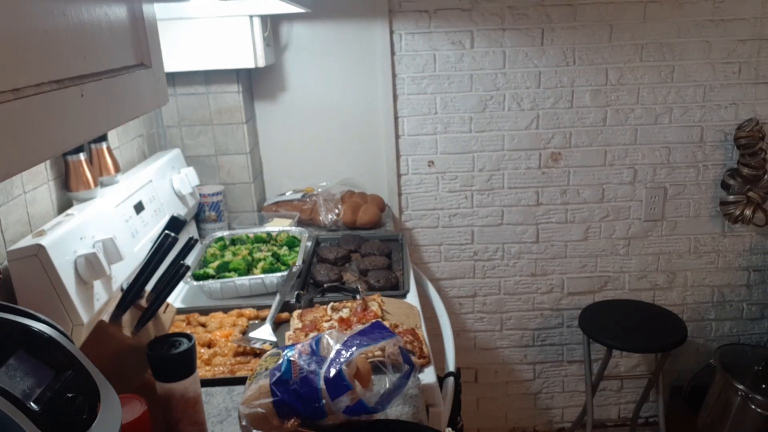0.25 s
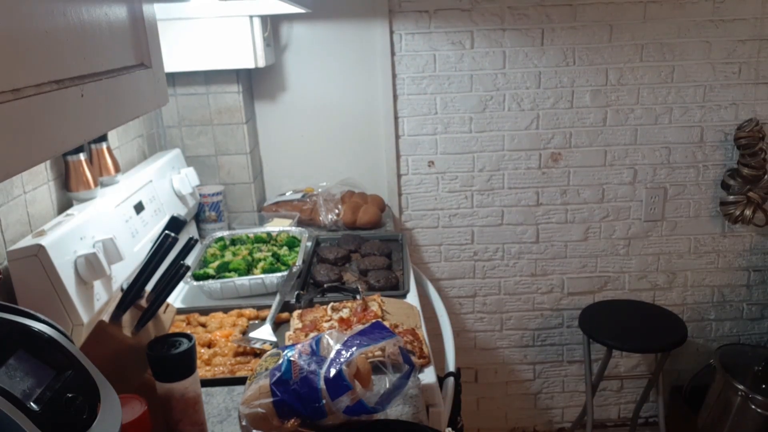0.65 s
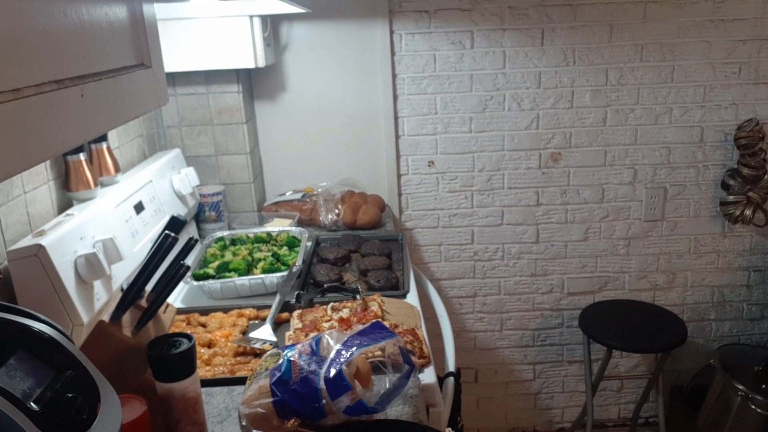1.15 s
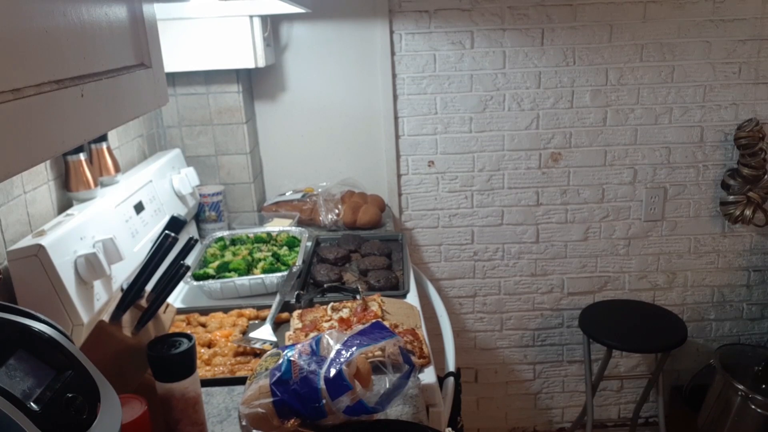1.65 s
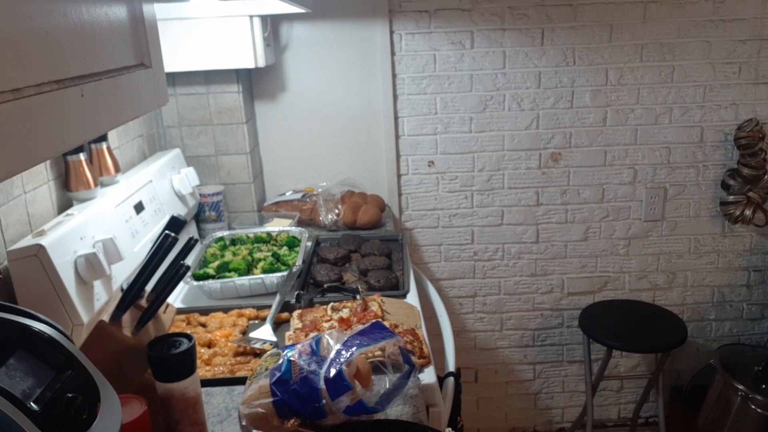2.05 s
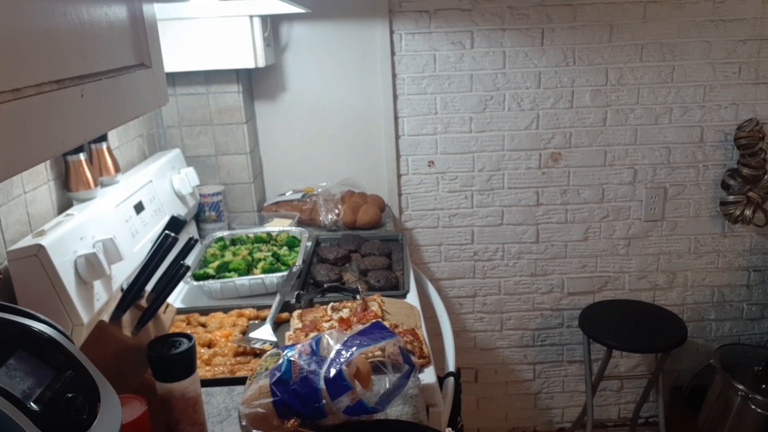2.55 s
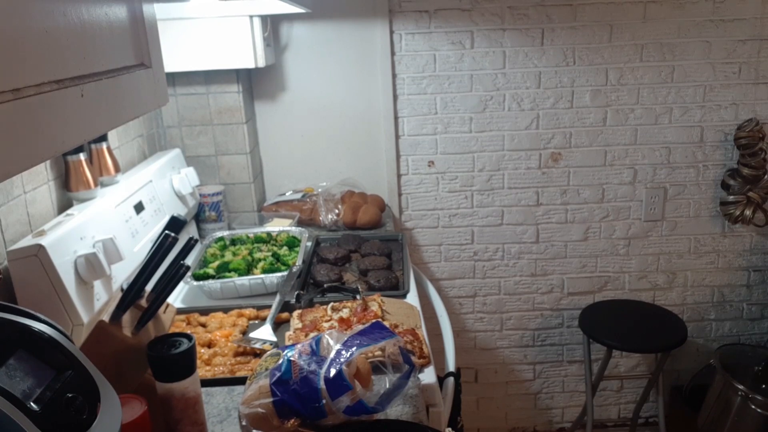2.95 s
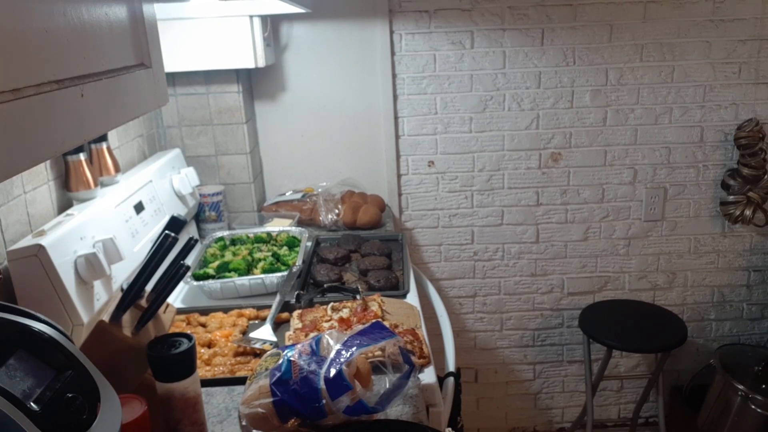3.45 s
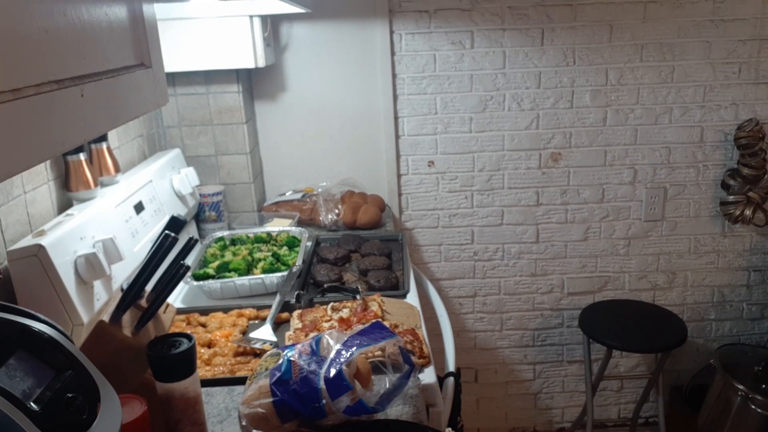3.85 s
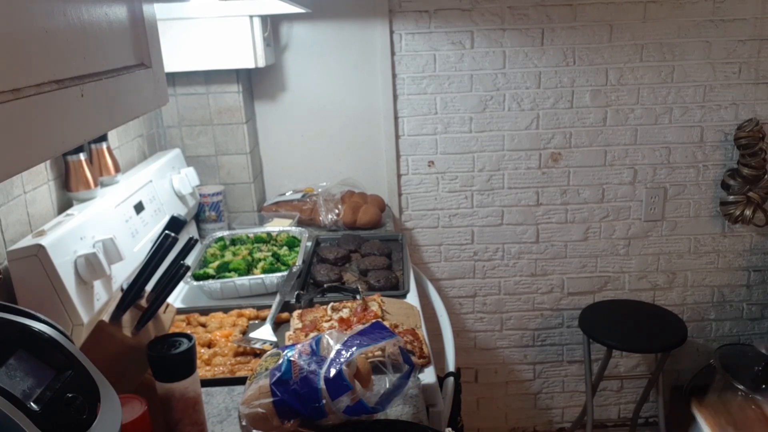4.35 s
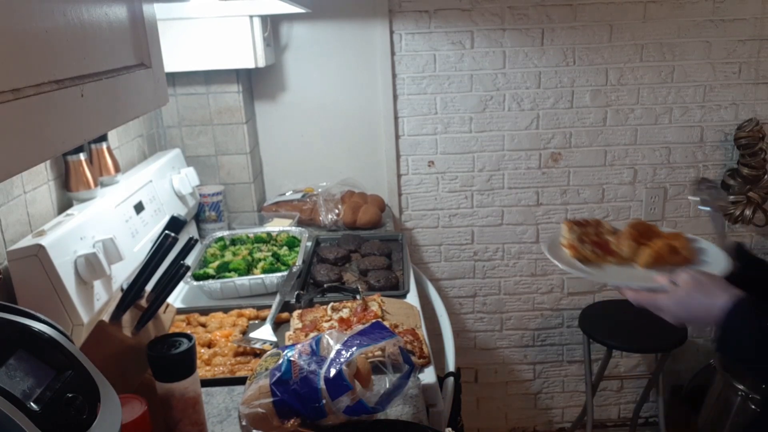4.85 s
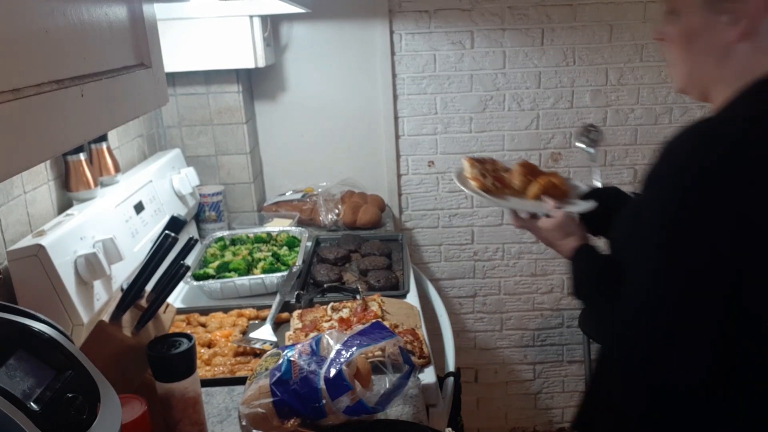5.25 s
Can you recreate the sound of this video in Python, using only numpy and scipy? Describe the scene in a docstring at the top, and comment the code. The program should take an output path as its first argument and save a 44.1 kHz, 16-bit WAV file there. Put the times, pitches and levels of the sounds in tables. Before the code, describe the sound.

Foil tray scooping comes first: sharp buckling, gritty scrapes, padded knocks and wet little plops, in uneven bursts. After a final crackling scrape and knock, a quiet gap follows with faint hum and room air. Then clothing swishes and soft footfalls come closer, with small ticks and a single bouncing spoon clink on a plate. The stationary stereo microphone hears lively indoor reflections.

```python
"""Scooping food from a foil tray

A steel spoon digs food out of a thin aluminium tray in a small, hard-walled kitchen. Rasps, crackles and the
tray's boom are streams of tiny slips; buckles and soft plops are shaped bursts of noise. A knock's boom is the
tray's lowest tone ringing out. Steps and rustling sleeves come nearer, with light ticks; a spoon clinks on a
china plate among them. The plate is made of ringing tones that fade away; room air and a faint appliance hum
lie below."""
import sys
import numpy as np
from scipy import signal
from scipy.fft import rfft, irfft, next_fast_len
from scipy.io import wavfile
from scipy.ndimage import uniform_filter1d, map_coordinates

SR = 44100
rng = np.random.default_rng(int(sys.argv[2]) if len(sys.argv) > 2 else 0)


def unload_wav(signal):
    """Save mono or channel-first audio to the path in sys.argv[1] as 16-bit WAV at rate SR, clipped to [-1, 1]."""
    wavfile.write(
        sys.argv[1],
        SR,
        np.round(np.clip(np.atleast_2d(signal).T, -1, 1) * 32767).astype(np.int16),
    )


N = 242285
TIME = np.arange(N) / SR  # seconds, whole scene
T = TIME[:SR // 2]  # seconds, one short sound

# Table levels are relative: the *_db settings of the functions and the room shift them further.
# Fade times (t60) are the time to fall by 60 dB, before any damping setting shortens them.

# Strokes of the spoon: (start [s], swell time [s], length [s], rasp at full swell [dB],
# rise during the swell [dB], foil fizz relative to the rasp [dB])
STROKES = [(0.048, 0.03, 0.35, -46.5, -10, -5), (0.373, 0.24, 0.71, -24, 17, 0),
           (0.652, .005, 0.02, -23, -5, 1), (1.129, 0.076, 0.11, -35.5, 14.5, -2),
           (1.325, 0.066, 0.13, -36, 11, -3.5), (1.49, .01, 0.014, -30, 3, 2.5),
           (1.534, 0.052, 0.45, -24.5, 23.5, -0.5), (1.941, 0.056, 0.31, -28.5, 1.5, 1),
           (2.318, 0.0093, 0.14, -44, 0, -6.5), (2.517, 0.075, 0.19, -46.5, 0, -9),
           (2.749, .06, .13, -50.5, -3, -7.5), (2.887, 0.5, 0.59, -30.5, 8.5, -2.5),
           (3.267, 0.022, 0.27, -37, 2, 9), (3.443, 0.017, 0.23, -22, 9, 5.5),
           (3.621, 0.019, 0.053, -27.5, -14, -1)]
HOLD_S, EASE_DB_PER_S = 0.062, 70  # the hand keeps up its pressure, then eases off
BITE_DB_PER_S, LIFT_DB_PER_S = 3002.5, 267  # the spoon meets the tray abruptly, leaves it gradually
BOOM_EVEN_DB = -36.5  # force at which boom and rasp are equal, before their own level settings
BOOM_GROWS = 0.57  # dB of boom per dB of rasp
# The foil buckles under the spoon: (time [s], peak [dB], fizz relative to it [dB])
BUCKLES = [(0.051, -26, -13), (0.145, -17.5, -3.5), (0.196, -15.5, -15), (0.343, -21, -27),
           (0.378, -16.5, -11), (0.44, -11.5, -8), (0.517, -13, 2), (0.572, -3, -13), (0.657, -1, -6),
           (0.92, -10, -11.5), (1.496, -8.5, -8.5), (2.05, -5, -3.5), (3.119, -13, -2.5),
           (3.454, -1.5, -11), (3.47, -1.5, -15), (3.501, -11, -3)]
# The spoon slips off the tray's rim and sings: (time [s], peak [dB])
RIM_SLIPS = [(1.39, -24)]
# The spoon knocks on the tray's floor: (time [s], peak [dB], boom relative to it [dB])
KNOCKS = [(0.5448, -10.5, -18), (1.141, -29, -22), (1.3684, -9.5, -17), (3.635, -14, 2)]
# Soft, dull plops and low thumps under the scraping: (time [s], peak [dB], wet smack relative to it [dB])
PLOPS = [(1.211, -20, -2.5), (1.498, -20.5, 11), (1.61, -16.5, -12), (1.679, -18.5, 4), (2.053, -14.5, -4),
         (2.076, -14.5, -15), (2.335, -16, -1), (2.352, -15.5, -6.5), (2.431, -20.5, -9), (2.61, -21, -5),
         (2.83, -24, -16), (2.847, -30.5, -5), (3.459, -11, -5), (3.642, -13, 0), (3.699, -30, 3)]
# Small morsels tumble while the spoon is in soft food
MORSELS_FROM_S, MORSELS_TO_S, MORSELS_PER_S = 2.4, 3.3, 8
MORSEL_DB, MORSEL_SMACK_DB, MORSEL_SCATTER_DB = -27.5, -6.5, 1.5
# The spoon lands on the plate and bounces: (time [s], level [dB])
CLINKS = [(4.9495, -3), (4.965, -20.5), (4.981, -15), (4.992, -17)]
# Light ticks on the plate: (time [s], peak [dB], treble relative to it [dB])
TICKS = [(3.919, -34, -15), (4.269, -33.5, -9), (4.5974, -27, -23), (4.874, -40.5, -20), (5.4211, -21, -10)]
PLATE_BLUR_HZ = 10  # the spoon chatters on the china and widens its tones
# Footfalls: (time [s], heel thud [dB], sole scuff [dB])
STEPS = [(4.354, -60, -34.5), (4.875, -45, -37.5), (5.15, -37.5, -30.5), (5.2, -30, -22.5),
         (5.288, -40.5, -33)]
# Sleeves swish while walking: (loudest moment [s], level [dB])
SWISHES = [(4.07, -59.5), (4.35, -57), (4.71, -51), (4.92, -58), (5.192, -38), (5.47, -47)]
SWISH_DB_PER_S = 147  # each swish rises and falls at this rate
# Steady rustle as the cook comes nearer: (time [s], level [dB])
RUSTLE = [(3.85, -64), (4.55, -63.5), (5.1, -49), (5.3, -48), (5.49, -45)]

# Ringing of the tray with the spoon in it: (frequency [Hz], level [dB], t60 [s])
TRAY_TONES = [(266.6, 0.5, 0.097), (378, -9.5, 0.16), (620, -8.5, 0.12), (822, -7, 0.098),
              (1090, -2.5, 0.1), (1320, -2, 0.088), (1444, -2.5, 0.067), (1830, -2.5, 0.06),
              (2110, -11, .1), (2700, -23.5, 0.15), (2810, -9.5, .1)]
# Ringing of the steel spoon: (frequency [Hz], level [dB], t60 [s])
SPOON_TONES = [(3790, -8, .15), (4082, 0, .2), (4900, -6, .12), (7320, -14, .2), (9151, -3, .18),
               (9894, -3, .18), (10071, -6, .14), (11532, -6, .12), (13697, -3, .16), (15346, -5, .14)]
# Ringing of the china plate: (frequency [Hz], level [dB], t60 [s])
PLATE_TONES = [(1030, -17, 0.1), (1420, -10.5, 0.2), (1737, -14, 0.16), (2060, -13, 0.2), (2610, -7, 0.29),
               (2836, 2, 0.13), (2820, -4.5, 0.21), (3220, 0.5, 0.12), (3300, -14, 0.28), (3770, -8, 0.2),
               (4210, -21, 0.12), (4600, -23, 0.1), (4730, 1, 0.081), (5450, -21, .2), (5460, -9.5, 0.11),
               (6020, -7, 0.14), (7300, -24.5, 0.24), (8660, -24, 0.24), (9900, -25, 0.28),
               (11300, -33, .16), (11560, -26, 0.24), (13600, -25, .16), (14900, -29, .16)]

# Noise colours; only the shape counts.
# The tray's boom: (frequency [Hz], density [dB per Hz])
BOOM = [(25, -59.5), (95, -26), (128, -10.5), (170, -16.5), (215, -4), (265, 0), (360, -2.5), (480, -2.5),
        (650, -7), (900, -18.5), (2000, -69.5), (8000, -80.5)]
# The tray's rasp: (frequency [Hz], density [dB per Hz])
RASP = [(60, -70.5), (300, -51.5), (600, -8), (850, -4), (1150, -4), (1700, -1), (2600, -5), (4000, -1),
        (5200, -3.5), (6500, -21.5), (7800, -22), (12000, -45.5)]
# The foil's fizz: (frequency [Hz], density [dB per Hz])
FIZZ = [(100, -80.5), (3000, -34.5), (6000, 0.5), (7200, -1.5), (7900, -8), (9000, 0.5), (11000, 4),
        (15600, 5), (17000, -10.5)]
# A soft, dull plop: (frequency [Hz], density [dB per Hz])
PLOP = [(25, -42.5), (70, -15.5), (128, -8.5), (170, -15.5), (250, -1), (370, 2.5), (480, -1.5),
        (650, -8.5), (900, -21.5), (2000, -42.5), (8000, -69.5)]
# A wet smack: (frequency [Hz], density [dB per Hz])
SMACK = [(60, -54.5), (400, -30.5), (900, 7), (1600, 7.5), (3000, 2), (5500, -10.5), (7500, -22),
         (15000, -21.5)]
# The crack of steel on china: (frequency [Hz], density [dB per Hz])
CRACK = [(60, -75), (400, -48), (750, -46), (1050, -13.5), (1900, 2.5), (2250, -19), (2900, 6.5),
         (4300, 2.5), (5900, 4.5), (6700, -25), (8000, -41), (10000, -29), (16000, -32)]
# A light tick on the plate: (frequency [Hz], density [dB per Hz])
TICK = [(100, -50), (700, -21), (2000, 4), (3300, 17.5), (5500, 19.5), (7500, -4.5), (15000, -30.5)]
# A heel on the floor: (frequency [Hz], density [dB per Hz])
THUD = [(25, -29), (55, -8), (78, -1), (100, -9), (125, -3), (200, -16), (500, -31), (4000, -77)]
# A sole on the floor: (frequency [Hz], density [dB per Hz])
SCUFF = [(80, -37), (250, 1.5), (400, 0.5), (620, -7), (1000, -9), (2000, -15.5), (5000, -29),
         (7500, -40.5), (15000, -42)]
# Rubbing cloth: (frequency [Hz], density [dB per Hz])
CLOTH = [(150, -18.5), (400, 4), (1000, -5), (2000, -4), (4500, -3.5), (6200, -10.5), (7500, -23),
         (15000, -21.5)]
# Room air: (frequency [Hz], density [dB per Hz])
AIR = [(18, -51), (30, -6.5), (95, -4.5), (170, -2.5), (449, -3.5), (649, -17.5), (1040, -15),
       (1390, -14.5), (4650, -20), (6720, -33), (7270, -34.5), (14800, -47), (16000, -38)]

# Appliance hum: (frequency [Hz], level [dB])
HUM = [(80.7, -69), (121, -64.5), (366, -72.5), (452, -75)]
# Fading of the room's tail, before its spectrum is flattened: (frequency [Hz], t60 [s])
WALLS = [(100, 0.6), (300, 0.32), (1500, 0.36), (5000, 0.33), (15000, 0.23)]
# How alike left and right are in echoes and air: (frequency [Hz], likeness from -1 to 1 [no unit])
ALIKE = [(100, 0.79), (300, 0.95), (640, 0.54), (1400, 0.062), (3100, -0.098), (7000, 0.032),
         (15000, 0.056)]
PORT_LAG = 5  # samples by which the right channel hears direct sound later
TOP_HZ = 16000  # band limit


def scraping(rasp_db=1.5, boom_db=-3, fizz_db=-1, tray_db=-11, spoon_db=-13):
    """The spoon's slips shake the tray's floor, rasp on its ribs and crackle its creases."""
    force, creasing = strokes()
    grip = shifting(slips(rate=900, spread_db=5.5, clump_db=2.5), depth_db=2)
    contact = force * grip
    rasp = amp(rasp_db) * colour(contact, RASP)
    tray = amp(tray_db) * thin(resonate(contact, TRAY_TONES, damping=2.7), lowest_hz=210)

    # the boom grows more slowly than the rasp
    shaking = amp(BOOM_EVEN_DB + boom_db) * (force / amp(BOOM_EVEN_DB)) ** BOOM_GROWS
    floor = colour(shaking * slips(rate=400, spread_db=2, clump_db=2.0), BOOM)

    crackle = slips(rate=3200, spread_db=9.0, clump_db=0.5)
    creases = amp(fizz_db) * creasing * (grip + crackle) / np.sqrt(2)
    foil = colour(creases, FIZZ)
    spoon = amp(spoon_db) * resonate(creases, SPOON_TONES, damping=3.2)
    return rasp + tray + floor + foil + spoon


def strokes():
    """Each stroke bites, swells, holds, eases off and lifts; gives the force on tray and creases."""
    force, creasing = np.zeros(N), np.zeros(N)
    for start, swell_s, length_s, db, swell_db, fizz_db in STROKES:
        t = TIME - start
        swell = swell_db * np.clip(t / swell_s - 1, -1, 0)
        ease = EASE_DB_PER_S * np.maximum(t - swell_s - HOLD_S, 0)
        bite = BITE_DB_PER_S * np.maximum(-t, 0)
        lift = LIFT_DB_PER_S * np.maximum(t - length_s, 0)
        push = amp(db + swell - ease - bite - lift)
        force = np.hypot(force, push)
        creasing = np.hypot(creasing, push * amp(fizz_db))
    return force, creasing


def buckles(gain_db=-3.0, boom_db=-17, fizz_db=2, spoon_db=-22, t60=0.19, growth=0.33):
    """Each buckle is a run of snaps, longer when harder, that also rings the spoon."""
    out = np.zeros(N)
    for s, db, fizz in BUCKLES:
        run = burst(t60 * amp(growth * db)) * rng.random(len(T)) ** 3  # uneven snaps
        snaps = run + 0.68 * burst(0.0107)  # plus a sharp start
        sound = peak(colour(snaps, RASP))
        sound += amp(boom_db) * peak(colour(snaps, BOOM))
        sound += amp(fizz + fizz_db) * peak(colour(snaps, FIZZ))
        sound += amp(spoon_db) * peak(ring(SPOON_TONES))
        add(out, s, amp(db + gain_db) * sound)
    return out


def rim_slips(slide_t60=0.063, damping=1.0):
    """A short slide along the rim sets the freed spoon ringing."""
    out = np.zeros(N)
    for s, db in RIM_SLIPS:
        add(out, s, amp(db) * peak(resonate(burst(slide_t60), SPOON_TONES, damping)))
    return out


def knocks(gain_db=0, boom_db=2, scrape_db=-8, lowest_hz=190):
    """Blows padded by food: the tray's upper tones die quickly, its lowest is damped less."""
    out = np.zeros(N)
    for s, db, boom in KNOCKS:
        sound = peak(ring(TRAY_TONES[1:], damping=2.1))
        sound += amp(boom + boom_db) * peak(ring(TRAY_TONES[:1], damping=1.26))
        sound += amp(scrape_db) * peak(colour(burst(0.0084), SMACK))
        add(out, s, amp(db + gain_db) * sound)
    return thin(out, lowest_hz)


def plops(gain_db=-2, smack_db=-1):
    """Soft, dull plops and low thumps: short dark noise with a wet smack on top."""
    out = np.zeros(N)
    for s, db, smack in PLOPS + morsels():
        plop = peak(colour(burst(0.034), PLOP))
        wet = amp(smack + smack_db) * peak(colour(burst(0.069), SMACK))
        add(out, s, amp(db + gain_db) * (plop + wet))
    return out


def morsels():
    """Small bits of food fall at uneven moments: (time [s], peak [dB], wet smack [dB])."""
    falls = []
    for slot in np.arange(MORSELS_FROM_S, MORSELS_TO_S, 1 / MORSELS_PER_S):
        late, heft = rng.random(2)
        db = MORSEL_DB + MORSEL_SCATTER_DB * (2 * heft - 1)
        falls.append((slot + late / MORSELS_PER_S, db, MORSEL_SMACK_DB))
    return falls


def plate(crack_db=-2, ring_db=0, tick_db=2, top_db=-2):
    """Steel on china: a few light ticks and one ringing, bouncing clink."""
    out = np.zeros(N)
    for s, db in CLINKS:
        tones = ring(PLATE_TONES, damping=1.18, blur_hz=PLATE_BLUR_HZ)
        china = amp(ring_db) * peak(thin(tones, lowest_hz=910))
        crack = amp(crack_db) * peak(colour(burst(0.043), CRACK))
        add(out, s, amp(db) * (china + crack))
    for s, db, top in TICKS:
        touch = burst(0.0083) + 0.29 * burst(0.077)  # a tap and a short slide
        treble = amp(top + top_db) * peak(colour(touch, FIZZ))
        add(out, s, amp(db + tick_db) * (peak(colour(touch, TICK)) + treble))
    return out


def walking(thud_db=2, scuff_db=1, cloth_db=0):
    """Heels thud on the floor, soles scuff and sleeves rustle."""
    out = np.zeros(N)
    roll = 1 - np.exp(-T / 0.0061)  # the sole rolls onto the floor
    for s, thud, scuff in STEPS:
        heel = amp(thud + thud_db) * peak(colour(burst(0.14), THUD))
        sole = amp(scuff + scuff_db) * peak(colour(roll * burst(0.072), SCUFF))
        add(out, s, heel + sole)
    rubbing = amp(cloth_db) * sleeves() * slips(rate=3000, spread_db=-0.5, clump_db=4)
    return out + colour(rubbing, CLOTH)


def sleeves():
    """Strength of the cloth's rubbing: swishes over a rustle that comes nearer."""
    swishes = sum(amp(db - SWISH_DB_PER_S * np.abs(TIME - s)) for s, db in SWISHES)
    s, db = np.transpose(RUSTLE)
    rustle = amp(np.interp(TIME, s, db)) * (TIME > s[0])
    return np.hypot(swishes, rustle)


def background(air_db=-62, hum_db=0, waver=1.2):
    """Room air is coloured noise; the appliance hums in tones whose phase wavers (radians)."""
    noises = np.array([colour(rng.standard_normal(N), AIR) for _ in range(2)])
    air = amp(air_db) * unit(spread(noises))
    hum = np.zeros(N)
    for hz, db in HUM:
        phase = 2 * np.pi * hz * TIME + waver * wobble(19)
        hum += amp(db + hum_db) * np.sqrt(2) * np.sin(phase)
    return air + hum


def kitchen(x, direct_db, early_db=0, early_t60=0.037, count=24):
    """Direct sound, near walls and a tail; the echo pattern changes from piece to piece."""
    out = np.zeros((2, N))
    hop = N // count + 1
    for centre in range(0, N + hop, hop):
        # an echo is noise that fades, at its own rate for each frequency
        hz, t, z = signal.stft(rng.standard_normal((2, SR // 2)), SR, nperseg=256)
        tail = amp(-60 * t / along(WALLS, hz)[:, None])
        early = amp(early_db - 60 * t / early_t60)
        noise = signal.istft(z * (tail + early), SR, nperseg=256)[1]
        echo = spread(even(noise))
        echo /= np.linalg.norm(echo) / np.sqrt(2)
        span = np.arange(max(centre - hop, 0), min(centre + hop, N))
        piece = x[span] * np.cos(np.pi / 2 * (span - centre) / hop)  # neighbours cross-fade
        for channel, response in zip(out, echo):
            add(channel, span[0] / SR, signal.fftconvolve(piece, response))
    direct = np.array([x, np.pad(x, (PORT_LAG, 0))[:N]])  # left hears it a little sooner
    return (out + amp(direct_db) * direct) / np.hypot(1, amp(direct_db))


def even(echo, share=0.7):
    """Flatten an echo's random spectrum to sound less tonal, faded out over a third of a second."""
    n = SR // 3
    h = rfft(echo, SR)
    fade = np.cos(np.linspace(0, np.pi / 2, n))
    return irfft(h / (np.abs(h) + 1e-9) ** share)[:, :n] * fade


def spread(pair):
    """Turn two unrelated noises into left and right with the likeness in ALIKE."""
    def mix(hz):
        angle = np.arccos(along(ALIKE, hz)) / 2
        return np.array([np.cos(angle), np.sin(angle)])

    mid, side = filtered(pair, mix)
    return np.array([mid + side, mid - side])


def slips(rate, spread_db, clump_db):
    """Stick-slip impulses (rate per second) of uneven size that come in clumps, rms 1."""
    unevenness = spread_db * np.clip(rng.standard_normal(N), -2, 2)
    sizes = amp(unevenness + clump_db * wobble(70))
    happens = rng.random(N) < rate / SR
    return unit(happens * rng.choice([-1, 1], N) * sizes)


def shifting(x, depth_db, size=7):
    """The colour changes from patch to patch as the contact point moves."""
    z = signal.stft(x, nperseg=512)[2]
    field = rng.standard_normal(z.shape)
    for axis in (0, 1):  # smooth over frequency, then time
        field = uniform_filter1d(field, size, axis)
    return unit(signal.istft(z * amp(depth_db * unit(field)), nperseg=512)[1][:N])


def ring(modes, damping=1, scatter_db=0.0, blur_hz=0):
    """Fading tones with random signs; scatter varies their strength, blur makes their pitch wander."""
    hz, db, t60 = np.transpose(modes)[:, :, None]
    strength = amp(db + scatter_db * rng.standard_normal(db.shape)) * rng.choice([-1, 1], db.shape)
    steps = rng.standard_normal((len(hz), len(T)))
    drift = np.cumsum(steps, 1) * np.sqrt(2 * np.pi * blur_hz / SR)
    tones = np.sin(2 * np.pi * hz * T + drift)
    return np.sum(strength * amp(-60 * damping * T / t60) * tones, 0)


def resonate(x, modes, damping):
    """Let x set a group of tones ringing, keeping about its power."""
    response = ring(modes, damping, scatter_db=0.5)
    return signal.fftconvolve(x, response / np.linalg.norm(response))[:N]


def burst(t60):
    """A puff of noise that dies away."""
    return rng.standard_normal(len(T)) * amp(-60 * T / t60)


def thin(x, lowest_hz):
    """A small object radiates little deep bass."""
    return signal.sosfilt(signal.butter(2, lowest_hz, "high", fs=SR, output="sos"), x)


def colour(x, spectrum, size=4096):
    """Filter x to the given spectrum without pre-echo, keeping the power of white noise."""
    cepstrum = irfft(np.log(amp(along(spectrum, np.fft.rfftfreq(size, 1 / SR)))))
    # folding the second half onto the first puts the response after time zero
    cepstrum[1:size // 2] *= 2
    cepstrum[size // 2 + 1:] = 0
    response = irfft(np.exp(rfft(cepstrum)))
    return signal.fftconvolve(x, response / np.linalg.norm(response))[:len(x)]


def filtered(x, response):
    """Multiply the spectrum of x by a response that depends on frequency."""
    n = x.shape[-1]
    m = next_fast_len(n + 8192)
    return irfft(rfft(x, m) * response(np.fft.rfftfreq(m, 1 / SR)), m)[..., :n]


def along(points, hz):
    """Read a (frequency [Hz], value) table on a log frequency axis."""
    f, v = np.transpose(points)
    return np.interp(np.log(hz + 1), np.log(f + 1), v)


def wobble(rate):
    """A smooth random curve with this many knots a second."""
    return map_coordinates(rng.standard_normal(int(N * rate / SR) + 4), [TIME * rate])


def add(track, s, sound):
    """Mix a sound in at time s (seconds)."""
    start = max(round(s * SR), 0)
    track[start:start + len(sound)] += sound[:N - start]


def amp(db):
    """Decibels to gain."""
    return 10 ** (np.asarray(db) / 20)


def unit(x):
    """Scale to rms 1."""
    return x / np.sqrt(np.mean(x ** 2) + 1e-20)


def peak(x):
    """Scale to peak 1."""
    return x / np.abs(x).max()


def scene():
    """All sources in the kitchen; plate and walking sit a little to the right."""
    digging = kitchen(scraping() + buckles() + rim_slips() + plops(), direct_db=-6)
    knocking = kitchen(knocks(), direct_db=1.5)
    approaching = kitchen(plate() + walking(), direct_db=-6.5) * amp([[-.5], [.5]])  # left, right
    return digging + knocking + approaching + background()


def record(dry):
    """Round off the highest peaks, then cut steeply above the band limit."""
    rounded = dry / (1 + (dry / .68) ** 6) ** (1 / 6)
    return filtered(rounded, lambda hz: 1 / np.sqrt(1 + (hz / TOP_HZ) ** 200))


dry = scene()
out = record(dry)
unload_wav(out)
```